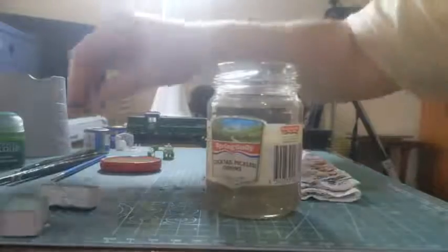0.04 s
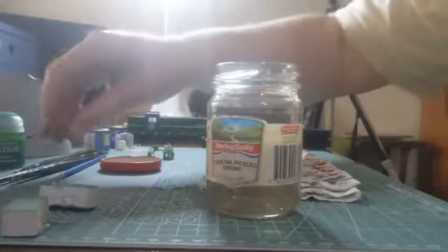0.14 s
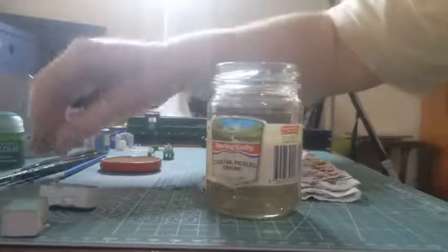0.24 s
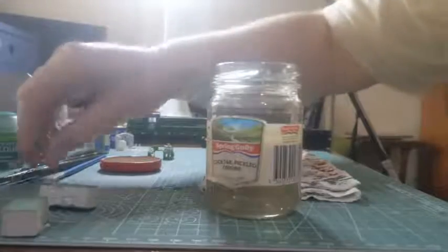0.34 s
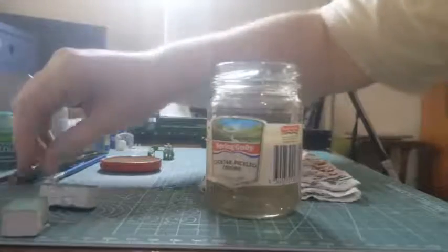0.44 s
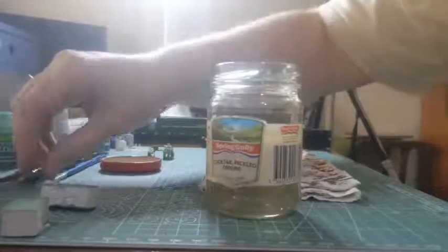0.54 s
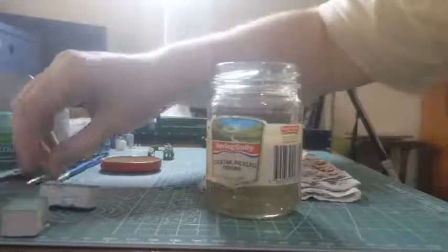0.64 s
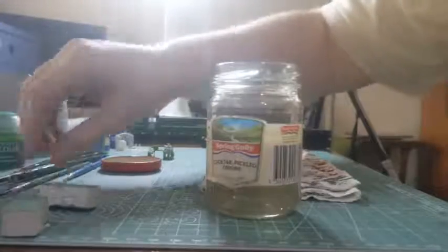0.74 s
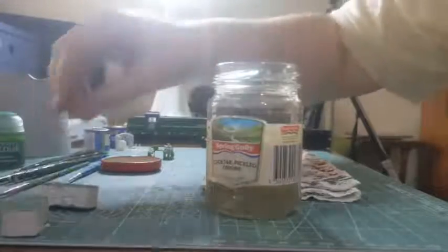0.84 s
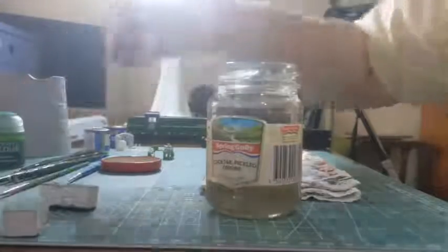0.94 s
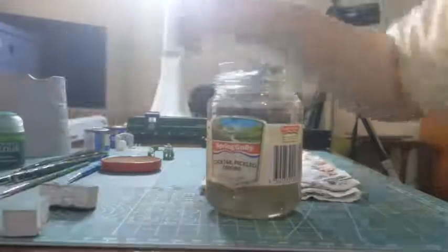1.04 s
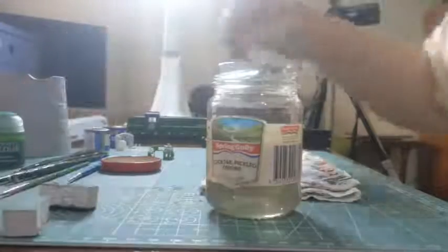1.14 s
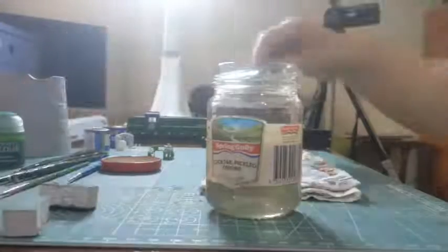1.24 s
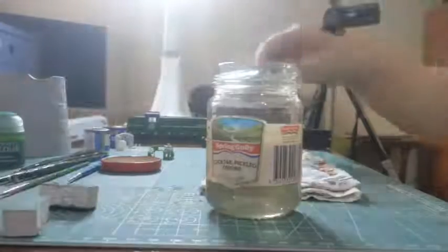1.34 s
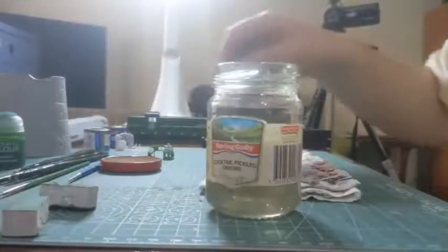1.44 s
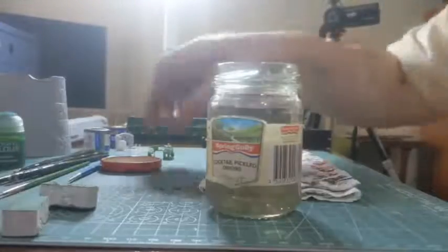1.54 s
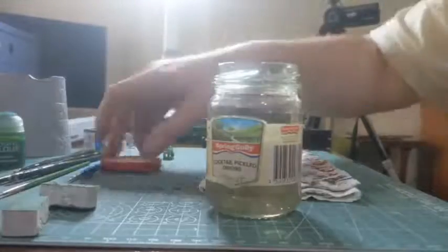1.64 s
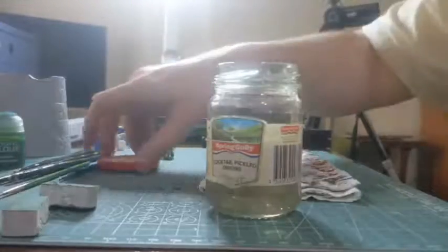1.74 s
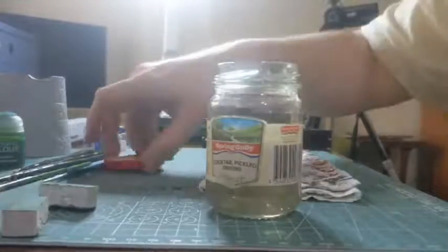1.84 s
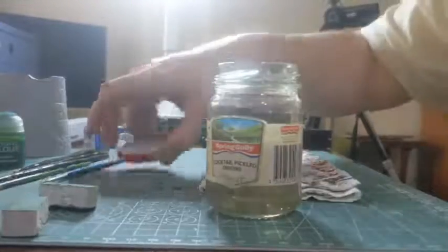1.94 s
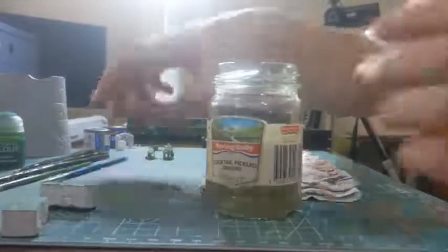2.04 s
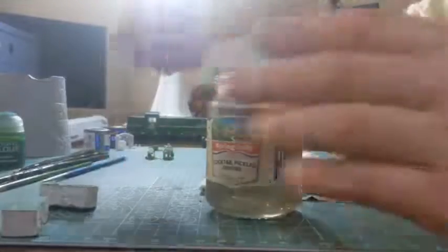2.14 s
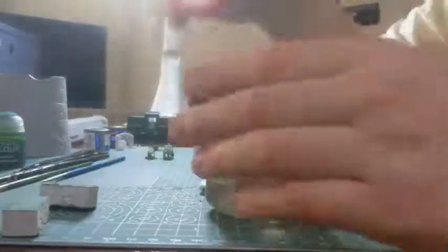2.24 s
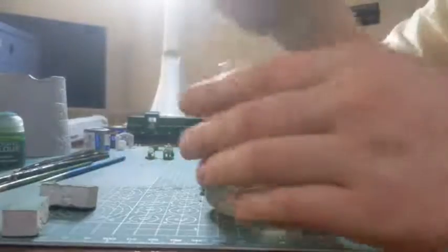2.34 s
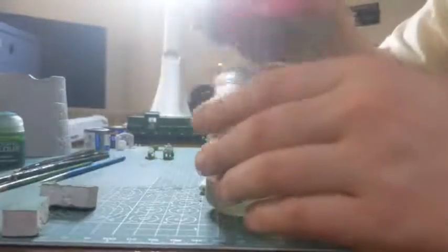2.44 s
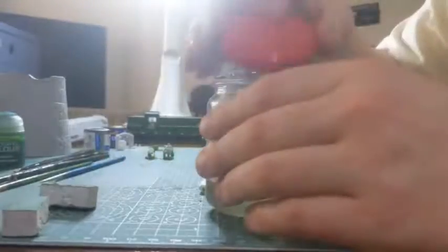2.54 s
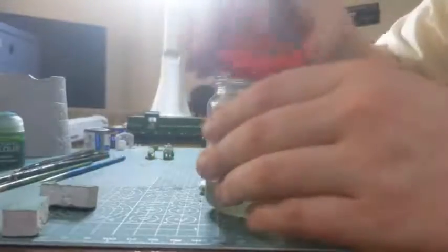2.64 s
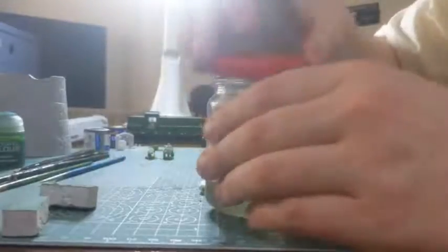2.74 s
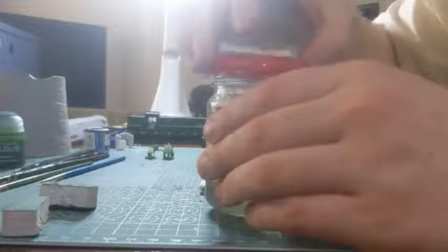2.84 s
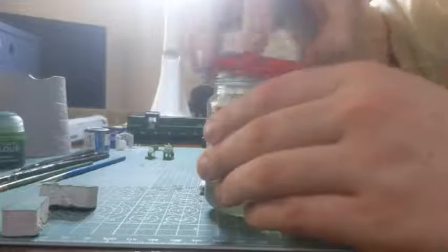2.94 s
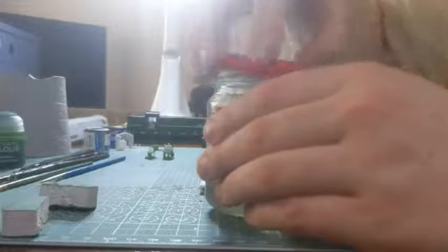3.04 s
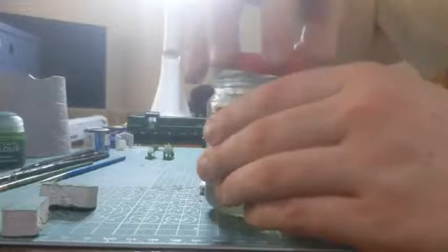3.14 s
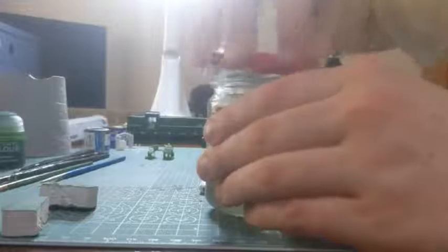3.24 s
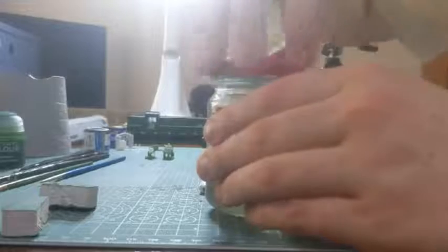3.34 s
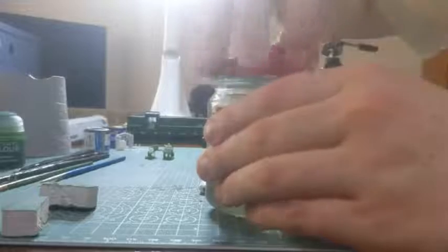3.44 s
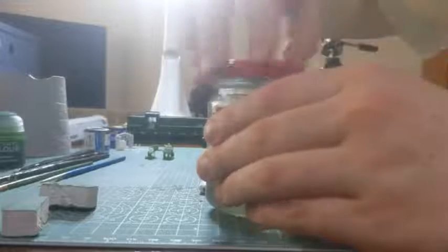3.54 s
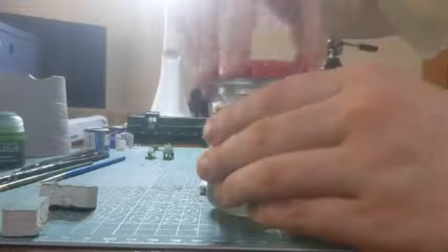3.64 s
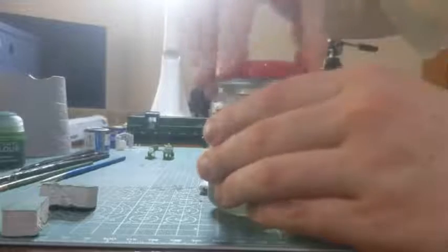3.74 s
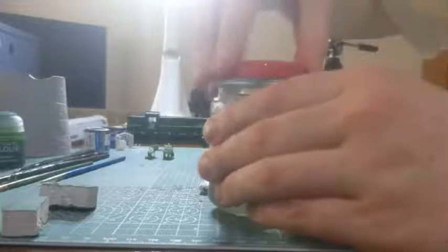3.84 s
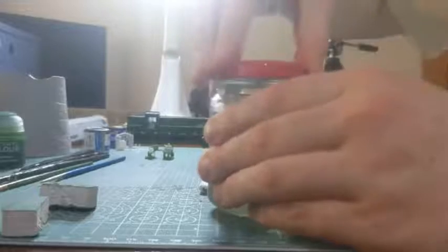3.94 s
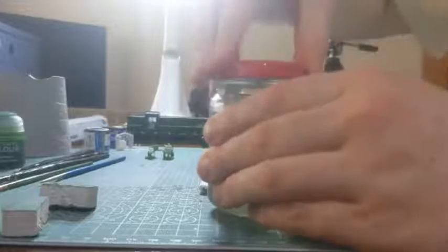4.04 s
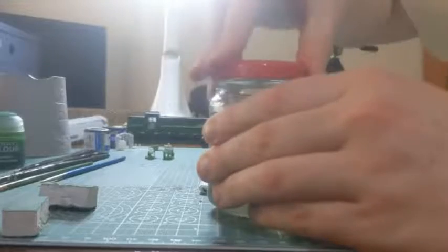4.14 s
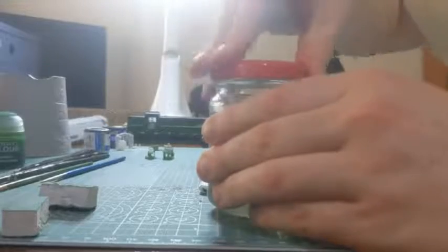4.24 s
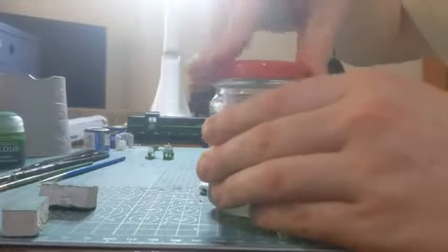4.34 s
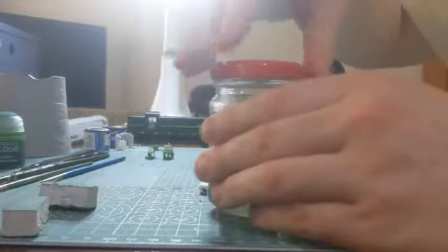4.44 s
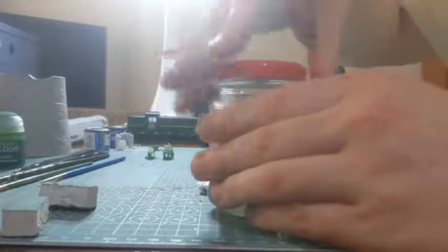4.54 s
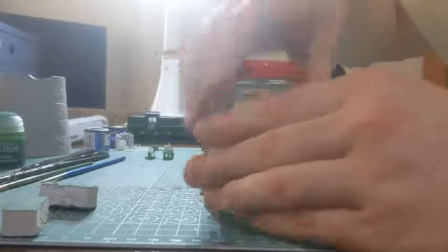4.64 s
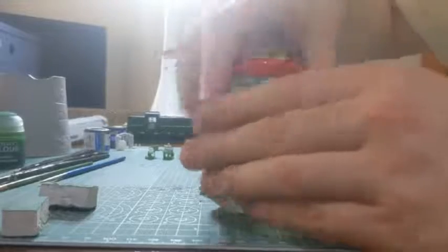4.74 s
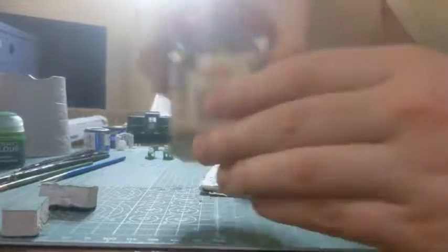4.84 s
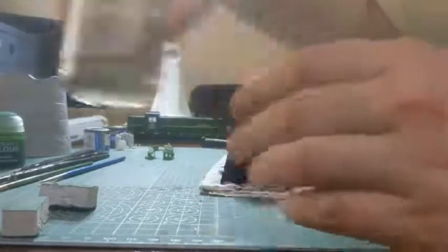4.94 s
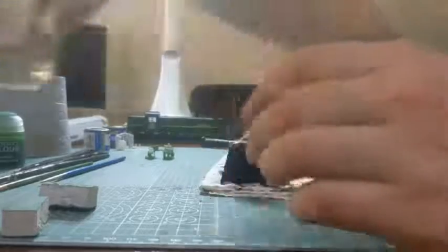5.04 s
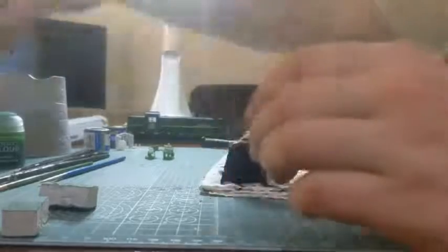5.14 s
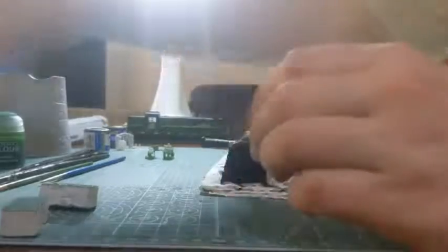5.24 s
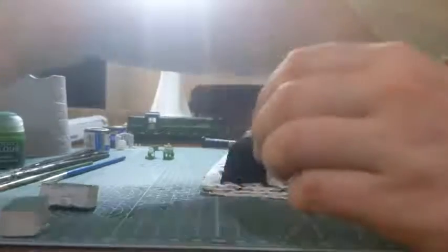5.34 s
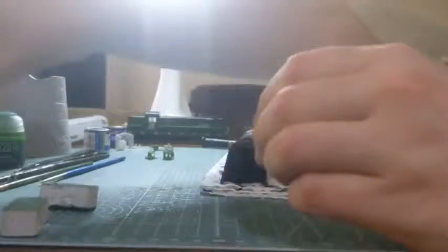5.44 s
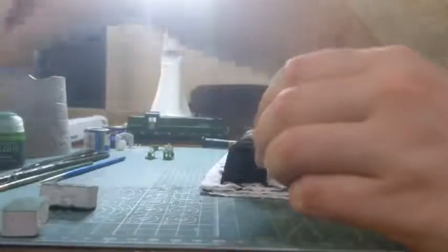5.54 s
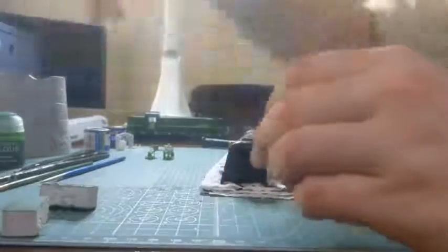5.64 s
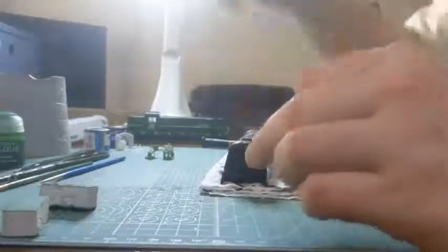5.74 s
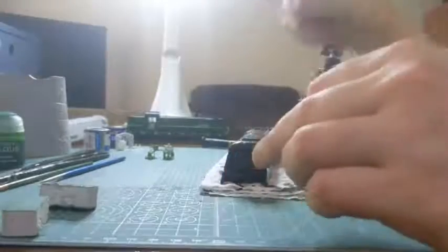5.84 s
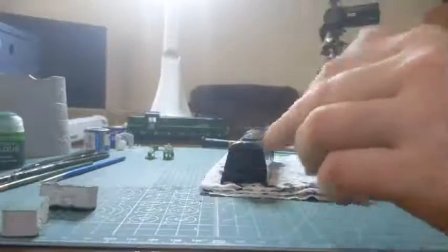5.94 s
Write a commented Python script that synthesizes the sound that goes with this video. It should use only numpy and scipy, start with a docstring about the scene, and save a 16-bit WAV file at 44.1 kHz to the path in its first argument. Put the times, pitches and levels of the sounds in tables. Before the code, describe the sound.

At a work desk in a small room, close to a stereo microphone, thin tools tick briefly, then a metal lid snaps off a mat. It clinks onto a glass jar and twists shut with hollow, pitched knocks and small scrapes, growing tighter and duller. Fingers shift the jar with soft thuds and faint lid ticks. Finally the jar is set down hard beside, a loud woody knock with a small rocking echo.

```python
"""A metal lid is seated on a glass jar and twisted shut at a work desk, close to the microphone.
Each contact rings the air in the jar as a dying sine, lower overall as the lid closes, with panel and glass modes.
Before it, thin tools tick (shaped noise bursts) and the lid snaps off a mat (noise and modes).
After it, fingers shift the jar (dull thuds) and flick off the taut lid (modes).
The jar then lands hard to one side: noise knocks, booming desk modes. A small room answers; soft swishes, a hum."""
import sys
import numpy as np
from scipy import signal
from scipy.fft import rfft, irfft
from scipy.io import wavfile
from scipy.ndimage import uniform_filter1d

SR = 44100
rng = np.random.default_rng(int(sys.argv[2]) if len(sys.argv) > 2 else 0)


def to_wav(s):
    """Save 16-bit WAV."""
    ch = np.atleast_2d(s).T  # columns
    pcm = np.round(np.clip(ch, -1, 1) * 32767)  # PCM
    wavfile.write(sys.argv[1], SR, pcm.astype(np.int16))


N = 263718
T = np.arange(SR * 3 // 4) / SR  # time axis of one event [s]
CUTOFF_HZ = 16100
# the lid sits flat, its seal bites, it is tight
SEATED_S, BITE_S, TIGHT_S = 2.91, 3.705, 3.752

# low body of tools and lid rim: (frequency [Hz], relative level per Hz [dB])
BODY_SPECTRUM = [(100, -4.5), (380, -2), (700, 4), (1100, -5), (1600, -2), (3500, 2.5), (6000, -4.5),
                 (9000, -21), (16000, -35)]
# click of lid on jar: (frequency [Hz], relative level per Hz [dB])
CLICK_SPECTRUM = [(80, -30.5), (400, 3.5), (1200, 8), (1750, -6.5), (2100, -1), (3400, 3), (3950, -8.5),
                  (4600, 2), (5450, -3), (6300, -6), (7300, -7), (8100, -6.5), (12400, -6), (16000, -13.5)]
# pitch of the air in the jar, falling overall as the gap under the lid narrows: (time [s], frequency [Hz])
JAR_AIR_PITCH = [(2.79, 1173), (2.83, 1120), (2.91, 795), (3.23, 733), (3.44, 770), (3.53, 761),
                 (3.55, 659), (3.61, 613), (3.72, 670), (3.77, 650)]


def amp(db):
    """Amplitude factor of a level in dB."""
    return 10 ** (np.asarray(db) / 20)


def unit(x):
    """Scales to rms 1."""
    return x / np.sqrt(np.mean(x ** 2) + 1e-20)


def read(points, hz):
    """Reads a table on a log-frequency axis."""
    f, value = np.transpose(points)
    return np.interp(np.log(hz + 1), np.log(f + 1), value)


def progress(s, start, end):
    """Goes from 0 at start to 1 at end."""
    return np.clip((s - start) / (end - start), 0, 1)


def add(mix, s, sound):
    """Mixes a sound into both channels at time s."""
    part = mix[:, round(s * SR):][:, :sound.shape[1]]
    part += sound[:, :part.shape[1]]


def fade(t60):
    """Free decay, 60 dB in t60 seconds."""
    return np.exp(-np.log(1000) * T / t60)


def rise(s):
    """Build-up of a contact with time constant s."""
    return 1 - np.exp(-T / s)


def wobble(size, order):
    """Random unevenness of rms 1, smoothed twice over order samples."""
    smooth = uniform_filter1d(rng.standard_normal(size), order)
    return unit(uniform_filter1d(smooth, order))


def noise(spectrum, alike, size=len(T), uneven_db=0, treble_db=0):
    """Noise of rms 1, share alike common to both channels; uneven_db varies narrow bands, treble_db tilts it."""
    alike = np.clip(alike, 0, 1)
    shared = rng.standard_normal(size)
    white = np.sqrt(alike) * shared + np.sqrt(1 - alike) * rng.standard_normal((2, size))
    hz = np.fft.rfftfreq(size, 1 / SR)
    knots_hz = np.linspace(0, SR / 2, 120)
    ripple_db = uneven_db * np.interp(hz, knots_hz, rng.uniform(-1, 1, len(knots_hz)))
    tilt_db = treble_db * hz / CUTOFF_HZ
    return unit(irfft(rfft(white) * amp(read(spectrum, hz) + ripple_db + tilt_db), size))


def ring(modes, spread, uneven_db=0, damping=1, detune=0):
    """Dying modes, up to spread radians off per channel; the point of contact favours and shifts some of them."""
    offsets = spread * rng.uniform(-1, 1, (len(modes), 2, 1))
    favours_db = uneven_db * rng.uniform(-1, 1, len(modes))
    shifts = detune * rng.uniform(-1, 1, len(modes))
    total = 0
    for (hz, db, t60), offset, favour_db, shift in zip(modes, offsets, favours_db, shifts):
        tone = np.sin(2 * np.pi * hz * (1 + shift) * T + offset)
        total = total + amp(db + favour_db) * fade(t60 / damping) * tone
    return total


def resonate(x, hz, width_hz):
    """A resonance of gain 1 that follows the curve hz."""
    turn = np.exp(2j * np.pi * np.cumsum(hz) / SR)
    r = np.exp(-np.pi * width_hz / SR)
    return 2 * (turn * signal.lfilter([1 - r], [1, -r], x / turn)).real


def place(x, left_db, lead_ms, shadow_db=0):
    """Left-right level difference and left lead; the housing shades the treble from the right port."""
    hz = np.fft.rfftfreq(N, 1 / SR)
    balance = amp((left_db + shadow_db * hz / CUTOFF_HZ) / 2)
    late = np.exp(-2j * np.pi * hz * lead_ms / 1000)
    return irfft(rfft(x) * np.array([balance, late / balance]), N)


def room(x):
    """Sparse reflections of random sign, each band dying at its own speed."""
    # decay: (frequency [Hz], t60 [s])
    band_t60 = [(100, 0.88), (400, 0.38), (900, .5), (2000, 0.42), (5000, 0.55), (10000, 0.37),
                (16000, 0.32)]
    # colour: (frequency [Hz], relative level [dB])
    band_colour = [(60, -12.5), (300, 0.5), (800, 2), (1600, 3.5), (4500, -2.5), (10000, -0.5), (16000, -4)]
    reflections_per_s = 4000
    taps = rng.choice([-1., 1.], (2, len(T))) * (rng.random((2, len(T))) < reflections_per_s / SR)
    taps *= np.clip((T - .008) / 0.006, 0, 1)
    hz, t, bands = signal.stft(taps, SR, nperseg=256)
    decay = np.exp(-np.log(1000) * t / read(band_t60, hz)[:, None])
    bands = bands * decay * amp(read(band_colour, hz))[:, None]
    tail = signal.istft(bands, SR, nperseg=256)[1]
    tail = tail / np.linalg.norm(tail[0])
    return signal.fftconvolve(x.mean(0)[None], tail, axes=1)[:, :N]


def bump(thud_db, tap_db, rise_s):
    """A dull thud of the jar on the desk, with a tap: two decaying noises."""
    # (frequency [Hz], relative level per Hz [dB])
    thud_spectrum = [(25, -61.5), (55, -1.5), (110, -1.5), (190, -3.5), (300, -13), (600, -28.5),
                     (2000, -42.5), (16000, -76.5)]
    # (frequency [Hz], relative level per Hz [dB])
    tap_spectrum = [(60, -31), (300, 9.5), (700, 7), (1300, -0.5), (2500, -13), (4600, -9.5), (7000, -32),
                    (16000, -23.5)]
    thud = amp(thud_db) * noise(thud_spectrum, 0.76) * fade(0.13)
    tap = amp(tap_db) * noise(tap_spectrum, 0.88) * fade(0.099)
    return (thud + tap) * rise(rise_s)


def background():
    """Room floor, low hum, and soft swishes of cloth on moving and skin on lifting: three shaped noises."""
    # room floor: (frequency [Hz], relative level per Hz [dB])
    floor_spectrum = [(20, -29.5), (45, -10), (70, -5.5), (140, -3.5), (250, -3), (400, -10.5),
                      (700, -12.5), (1100, -34.5), (2000, -28), (4400, -44), (8000, -42), (14000, -24),
                      (16000, -36.5)]
    # swishes: (frequency [Hz], relative level per Hz [dB])
    swish_spectrum = [(60, -16.5), (250, -4), (550, -1), (1050, 2), (1800, 6), (3000, 4), (6500, 0),
                      (8000, -2), (12000, -2), (16000, -12.5)]
    # soft swishes: cloth as the arm moves, and faint skin hiss as the jar is lifted:
    # (middle [s], half length to 1/e of the power [s], level [dB])
    swishes = [(0, 0.036, -50), (0.23, 0.29, -62), (0.46, 0.13, -61.5), (0.722, 0.076, -62),
               (1.187, 0.054, -61), (1.582, 0.18, -59), (1.976, 0.077, -57.5), (2.55, 0.38, -59),
               (3.0, 0.088, -49.5), (4.856, 0.028, -63.5), (5.0, .02, -67), (5.154, 0.084, -67.5)]
    rest_db = -68  # between swishes
    hum_spectrum = [(100, -53), (130, -14.5), (139, -3.0), (148, -11.5), (190, -56), (1000, -91.5)]
    floor = amp(-63) * noise(floor_spectrum, 0.77, size=N)
    hum = amp(-68.5) * noise(hum_spectrum, .8, size=N)
    t = np.arange(N) / SR
    power = amp(rest_db) ** 2
    for s, half_s, db in swishes:
        power = power + amp(db) ** 2 * np.exp(-((t - s) / half_s) ** 2)
    uneven_db = wobble(size=N, order=900)
    swish = np.sqrt(power) * amp(uneven_db) * noise(swish_spectrum, 0.067, size=N)
    return floor + hum + place(swish, left_db=-3.5, lead_ms=0)


def tools():
    """Thin tools tick against one another: short bright noise over a low body."""
    # (time [s], tick level [dB], low body level [dB], t60 [s])
    clatter = [(.856, -23, -33.5, 0.027), (.869, -34, -40, .06), (0.8749, -16, -53, 0.017),
               (0.8785, -26.5, -49, .05), (.892, -20, -31, 0.026), (0.8985, -19.5, -26.5, 0.032),
               (0.908, -35, -21.5, 0.035)]
    # (frequency [Hz], relative level per Hz [dB])
    tick_spectrum = [(300, -17), (2000, -12.5), (4500, -21), (6000, -5.5), (7800, -2.5), (9500, 3.5),
                     (11300, 1.5), (13000, -8), (14000, 0), (16000, -8)]
    out = np.zeros((2, N))
    for s, db, body_db, t60 in clatter:
        tick = amp(db) * noise(tick_spectrum, 0.019, uneven_db=9)
        body = amp(body_db) * noise(BODY_SPECTRUM, 0.48)
        add(out, s, (tick + body) * rise(0.0019) * fade(t60))
    return place(out, left_db=-0.5, lead_ms=0.057, shadow_db=16.0) + amp(-8.5) * room(out)


def lid_pickup():
    """The rim drags on the mat, then the free lid snaps and rings briefly, face on to the microphone."""
    # rim catching and snapping off the mat: (time [s], level [dB], low body level [dB], t60 [s])
    catches = [(1.927, -47, -48.5, 0.072), (1.96, -59, -41, 0.079), (1.983, -54, -47.5, 0.7),
               (2.0136, -17.5, -38, 0.043), (2.0172, -14.5, -34, 0.019)]
    # (frequency [Hz], relative level per Hz [dB])
    snap_spectrum = [(300, -27), (2500, -61), (3600, -13), (5000, -5), (6500, 1.5), (7500, -7.5), (9000, 4),
                     (10200, -0.5), (11400, 6.5), (13200, 1), (15500, 1)]
    # free lid modes: (frequency [Hz], relative level [dB], t60 [s])
    free_modes = [(3570, -3.5, 0.024), (4560, 5.5, 0.013), (5400, -8, 0.016), (9800, -19, 0.064),
                  (11350, 0, 0.027), (11350, -13.5, .025), (11800, -19, .03)]
    lid_free_s, lid_ring_db = 2.0168, -16.5
    scrape, ping = np.zeros((2, 2, N))
    for s, db, body_db, t60 in catches:
        snap = amp(db) * noise(snap_spectrum, 0.39, uneven_db=2)
        body = amp(body_db) * noise(BODY_SPECTRUM, 0.92)
        add(scrape, s, (snap + body) * fade(t60) * rise(0.0011))
    add(ping, lid_free_s, amp(lid_ring_db) * ring(free_modes, spread=0.59) * rise(0.00092))
    direct = place(scrape + ping, left_db=1.5, lead_ms=0.063, shadow_db=5.5)
    return direct + amp(-7.5) * room(scrape + amp(-26) * ping)


def lid_twist():
    """Lugs knock along the thread: the trapped air, the lid's panel and the glass all ring."""
    # lid against the jar's neck: (time [s], strength [dB], hard edge relative to strength [dB])
    contacts = [(2.599, -47, -11), (2.7703, -20, -1), (2.7775, -26, -1.5), (2.7878, -19.5, -6),
                (2.821, -31.5, 6), (2.8287, -10, -14.5), (2.8712, -18.5, -25), (2.9102, -2.5, -10.5),
                (3.0775, -28.5, -30), (3.2215, -26, -39.5), (3.2362, -18.5, -47), (3.312, -32, -35.5),
                (3.340, -26.5, -33), (3.407, -32, -47), (3.4322, -24.5, -25), (3.481, -29, -22.5),
                (3.5098, -34, -42), (3.5307, -16, -42), (3.552, -10, -12.5), (3.703, -33, -13.5),
                (3.7225, -20.5, -23), (3.7265, -9.5, -25.5), (3.756, -25, -32), (3.769, -31, -4.5)]
    # lid panel modes: (frequency [Hz], relative level [dB], t60 [s])
    panel_modes = [(1226, 2, 0.02), (1347, -13.5, .025), (1910, -12, .02), (2700, -25.5, 0.024),
                   (3520, -20, .03)]
    # jar modes: (frequency [Hz], relative level [dB], t60 before the lid damps them [s])
    glass_modes = [(2976, -7, 0.057), (3500, -4, 0.053), (3700, -9.5, 0.066), (4676, -1, 0.11),
                   (4950, -7, .05), (5005, -5, 0.044), (5510, -7, .04), (5700, -3.5, 0.059),
                   (6380, -10.5, 0.063), (7830, -9.5, .045), (8010, -1.5, 0.064), (9600, -16, 0.021),
                   (12700, -10.5, .04), (13600, -12, .035)]
    touch_s = 2.76
    # the softer the edge, the slower the air tone builds up
    hard_rise_s, softer_per_doubling_db = 0.00039, 22.5
    # the closed seal chokes the air tone and speeds its decay
    air_t60_s, sealed_damping, sealed_db = 0.036, 3.7, -7
    # panel relative to strength: less for a soft edge, more as it is pulled taut
    panel_base_db, panel_per_edge_db, panel_taut_db = -8, 0.24, 11.5
    # glass relative to the edge: the pressed lid damps it; each contact shifts its modes by up to a share
    glass_loose_db, glass_pressed_db, glass_damping, grip_detune = -2.5, -15, 2.5, .008
    dull_per_db = 0.1  # treble lost per dB of softer edge
    # each contact shoves the jar on the desk, more as the lid tightens; sealed, lid and jar clunk as one
    push_delay_s, push_loose_db, push_tight_db, push_tap_db, sealed_tap_db = .006, -37.5, -29, -29, 19

    air, edge, push = np.zeros((3, 2, N))
    for s, db, edge_db in contacts:
        pressed = progress(s, touch_s, SEATED_S)
        taut = progress(s, SEATED_S, TIGHT_S)
        sealed = progress(s, BITE_S, TIGHT_S)

        hz = np.interp(s, *np.transpose(JAR_AIR_PITCH))
        rise_s = hard_rise_s * 2 ** (-edge_db / softer_per_doubling_db)
        tone = np.sin(2 * np.pi * hz * T) * rise(rise_s) * fade(air_t60_s / sealed_damping ** sealed)
        panel_db = panel_base_db + panel_per_edge_db * edge_db + panel_taut_db * taut
        panel = amp(panel_db) * ring(panel_modes, spread=1.0, uneven_db=6) * rise(0.0009)
        add(air, s, amp(db) * (amp(sealed_db * sealed) * tone + panel))

        glass_db = glass_loose_db + (glass_pressed_db - glass_loose_db) * pressed
        glass = amp(glass_db) * ring(glass_modes, spread=0.92, uneven_db=6.5,
                                     damping=glass_damping ** pressed, detune=grip_detune)
        click = noise(CLICK_SPECTRUM, 0.2565, uneven_db=6, treble_db=dull_per_db * edge_db) * fade(0.029)
        add(edge, s, amp(db + edge_db) * (click + glass) * rise(0.0006))

        thud_db = db + push_loose_db + (push_tight_db - push_loose_db) * taut
        tap_db = db + push_tap_db + sealed_tap_db * sealed
        add(push, s + push_delay_s, bump(thud_db, tap_db, rise_s=0.0052))
    air += lid_slide()
    # once the lid is seated, the fingers around it shield the room from its clicks
    shield = amp(np.interp(np.arange(N) / SR, [3, 3.5], [0, -6]))
    direct = place(air, left_db=0.6, lead_ms=0.18) + push
    direct = direct + place(edge, left_db=0, lead_ms=0.12, shadow_db=11.5)
    return direct + amp(-20) * room(air) + amp(-7.5) * room(edge * shield) + amp(-8.0) * room(push)


def lid_slide():
    """Tiny slips of the lugs on the glass thread keep the jar's air and the lid humming."""
    # wrist turns sliding the lid along the thread: (start [s], length [s], level before sag [dB])
    turns = [(2.953, 0.079, -44), (3.072, 0.061, -43.5), (3.322, 0.064, -47), (3.427, 0.059, -36),
             (3.545, 0.056, -33.5), (3.714, 0.052, -35)]
    # what slips ring besides the trapped air: (frequency [Hz], relative level per Hz [dB])
    scrape_spectrum = [(100, -11.5), (450, -9.5), (900, -2.5), (1250, 1), (1550, -10), (1900, -16.5),
                       (3500, -32), (7000, -36), (16000, -36.5)]
    # a turn starts briskly and slackens; a faint drag goes on between turns
    attack_s, sag_db, release_s, drag_db = 0.004, -5.5, 0.011, -55.5
    slips_per_s = 800
    t = np.arange(N) / SR
    effort = amp(drag_db) * (t > SEATED_S) * (t < TIGHT_S)
    for start, length, db in turns:
        attack = progress(t, start, start + attack_s)
        sagging = amp(db + sag_db * progress(t, start, start + length))
        release = np.exp(-np.maximum(t - start - length, 0) / release_s)
        effort = effort + attack * sagging * release
    slips = (rng.random(N) < slips_per_s / SR) * rng.standard_normal(N)
    pitch_hz = np.interp(t, *np.transpose(JAR_AIR_PITCH))
    air = unit(resonate(resonate(slips, pitch_hz, 170.1), pitch_hz, 170.2))
    colour = amp(read(scrape_spectrum, np.fft.rfftfreq(N, 1 / SR)))
    panel = unit(irfft(rfft(slips) * colour, N))
    return effort * (air + amp(-6.0) * panel)


def handling():
    """Fingers shift on the jar, lift it and move on the desk: dull thuds with a tap."""
    # (time [s], thud level [dB], tap level [dB])
    bumps = [(3.953, -41, -52), (4.102, -48, -44), (4.621, -49.5, -56), (4.842, -37.5, -48.5),
             (4.894, -37, -67), (4.93, -35.5, -48), (5.118, -48.5, -47.5), (5.175, -56, -48),
             (5.335, -48, -53.5)]
    out = np.zeros((2, N))
    for s, thud_db, tap_db in bumps:
        add(out, s, bump(thud_db, tap_db, rise_s=0.0088))
    return place(out, left_db=2.5, lead_ms=-0.067) + amp(-6.5) * room(out)


def lid_flicks():
    """The taut lid gives a short tick and ping as a finger lets go, and the jar nudges the desk."""
    # fingertip flicking off the lid: (time [s], ping level [dB], thud level [dB])
    flicks = [(4.2071, -63.5, -45.5), (4.4764, -49, -44)]
    # lid modes under tension: (frequency [Hz], relative level [dB], t60 [s])
    tight_modes = [(834, -3, 0.025), (1874, 0.5, 0.04), (1947, -6, 0.039), (2060, -7, 0.034),
                   (2515, -1, 0.026), (4550, 4, 0.03), (4500, 0.5, 0.03)]
    ping, nudge = np.zeros((2, 2, N))
    for s, ping_db, thud_db in flicks:
        tick = noise(CLICK_SPECTRUM, .25, treble_db=-25) * fade(.03)
        tones = amp(2) * ring(tight_modes, spread=0.56)
        add(ping, s, amp(ping_db) * (tones + tick) * rise(0.00038))
        add(nudge, s, bump(thud_db, tap_db=-50, rise_s=0.0012))
    return place(ping, left_db=-2, lead_ms=-0.1) + nudge + amp(-7.5) * room(ping + nudge)


def jar_landing():
    """The glass base punches the desk top, ticks, knocks and sets its modes booming."""
    # landing, then rocking flat: (time [s], knock level [dB], desk boom level [dB], glass tick level [dB])
    impacts = [(5.5431, -7, -20.5, -15), (5.5586, -9.5, -13, -22), (5.6847, -17, -50, -55),
               (5.697, -32, -26, -64.5), (5.765, -27.5, -39, -72)]
    # (frequency [Hz], relative level per Hz [dB])
    knock_spectrum = [(25, -49), (45, -8), (75, 1), (250, -4), (600, 7.5), (900, -0.5), (1300, -5.5),
                      (1800, -20.5), (2400, -22), (3300, -34), (5500, -43), (8000, -30), (10000, -48),
                      (16000, -45)]
    # glass base touching down: (frequency [Hz], relative level per Hz [dB])
    base_spectrum = [(300, -19), (1800, 2.5), (3300, 1.5), (5500, -6), (7500, -11.5), (10000, -20.5),
                     (16000, -26)]
    # desk modes: (frequency [Hz], relative level [dB], t60 [s])
    desk_modes = [(62.4, -25, 0.076), (86.4, 6, 0.11), (138.6, 0, 0.4), (205.3, -3, 0.18),
                  (333.7, 0.5, 0.15), (488, -7, 0.07), (564, -14.5, 0.14), (595, -4.5, 0.087),
                  (687.5, -2.5, 0.11), (840, -13.5, 0.12), (905, -24.5, 0.059), (950, -17.5, 0.041),
                  (1160, -5, 0.079), (1216, -17, 0.091), (1217, -14.5, 0.12), (1393, -16, 0.084)]
    punch_db, punch_t60_s = -9, 0.023  # short punch of the first touch-down
    blow, boom = np.zeros((2, 2, N))
    punch = amp(punch_db) * noise(knock_spectrum, 0.54) * fade(punch_t60_s) * rise(.001)
    add(blow, impacts[0][0], punch)
    for s, knock_db, boom_db, tick_db in impacts:
        knock = amp(knock_db) * noise(knock_spectrum, 0.36) * fade(0.075) * rise(0.00081)
        tick = amp(tick_db) * noise(base_spectrum, 0.17, uneven_db=4) * fade(0.035) * rise(0.00047)
        add(blow, s, knock + tick)
        add(boom, s, amp(boom_db) * ring(desk_modes, spread=0.4) * rise(0.0058))
    direct = place(blow, left_db=2, lead_ms=0.22) + place(boom, left_db=3, lead_ms=0.32)
    return direct + amp(-6.0) * room(blow + amp(-17) * boom)


def scene():
    """Sums all sources."""
    return background() + tools() + lid_pickup() + lid_twist() + handling() + lid_flicks() + jar_landing()


def record(dry):
    """The microphone sheds the deepest bass, loud peaks are rounded off; then the band limit."""
    thin = signal.sosfilt(signal.butter(2, 42, "high", fs=SR, output="sos"), dry)
    ceiling = .85
    held = thin / (1 + (thin / ceiling) ** 6) ** (1 / 6)
    lowpass = signal.firwin(511, CUTOFF_HZ, window=("kaiser", 9), fs=SR)
    return signal.oaconvolve(held, lowpass[None], "same")


dry = scene()
out = record(dry)
to_wav(out)
```